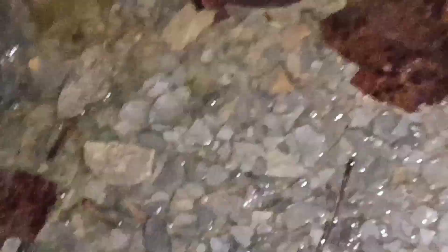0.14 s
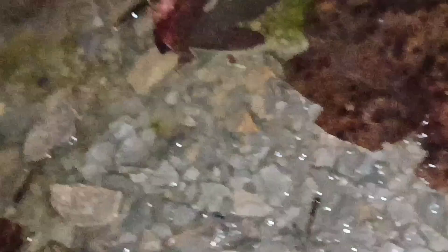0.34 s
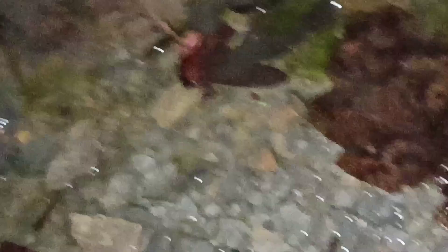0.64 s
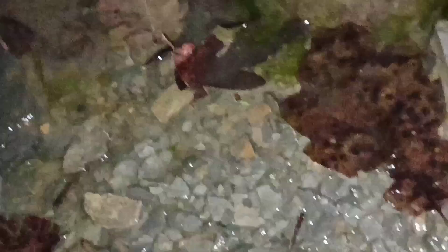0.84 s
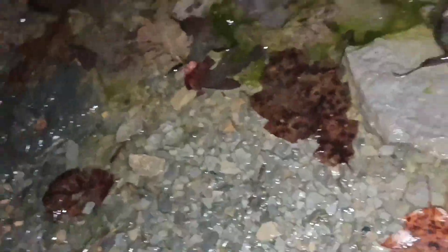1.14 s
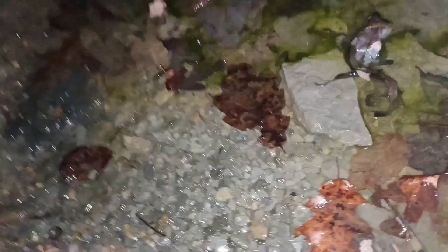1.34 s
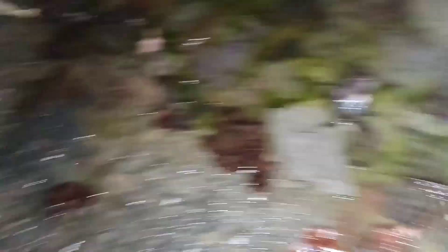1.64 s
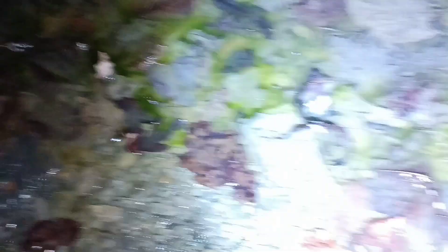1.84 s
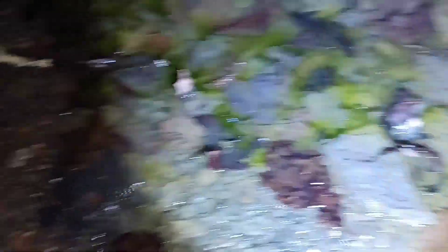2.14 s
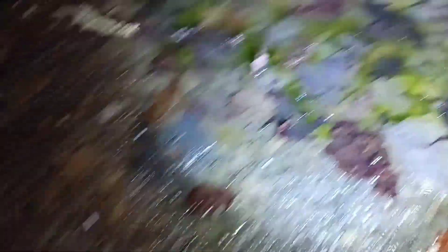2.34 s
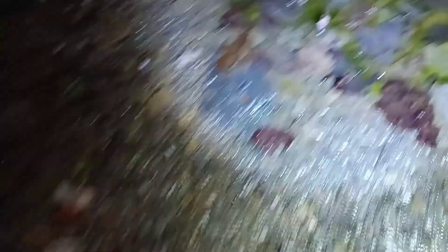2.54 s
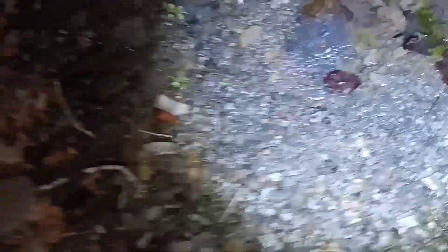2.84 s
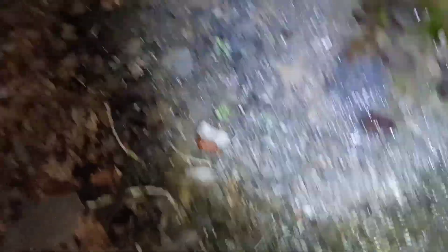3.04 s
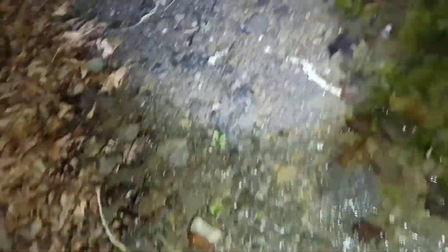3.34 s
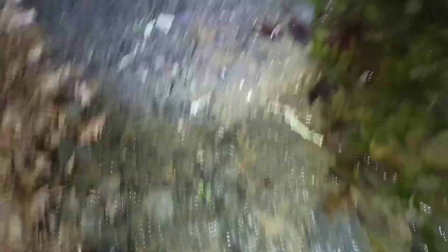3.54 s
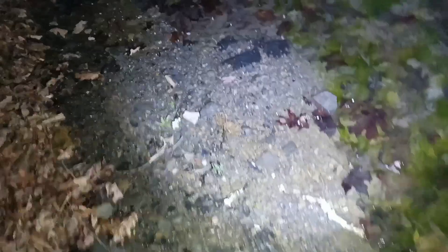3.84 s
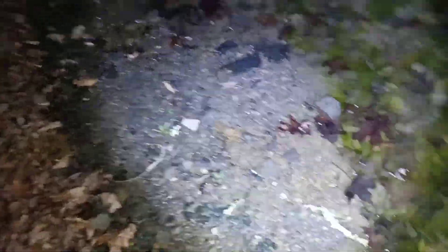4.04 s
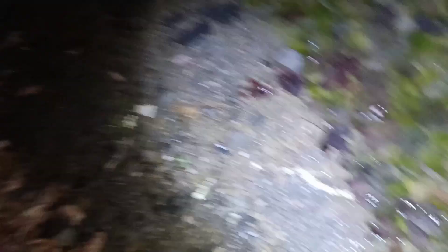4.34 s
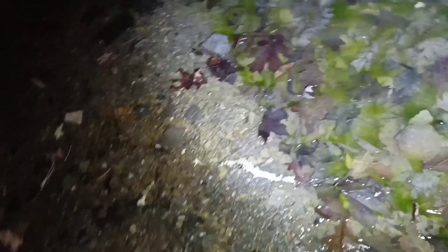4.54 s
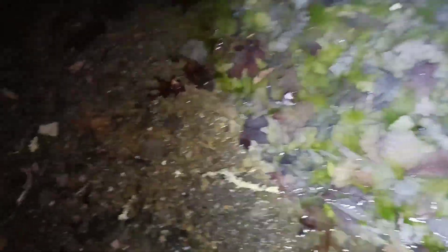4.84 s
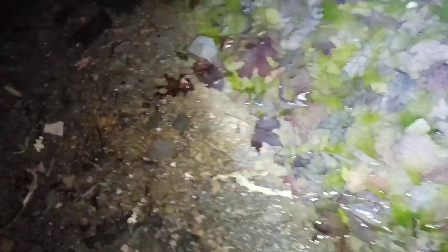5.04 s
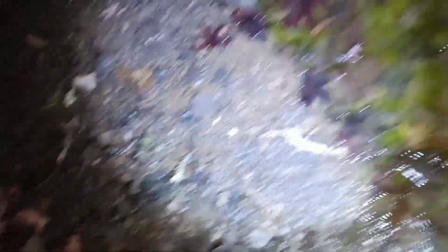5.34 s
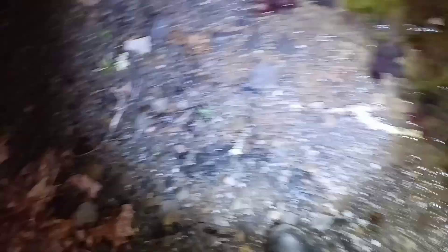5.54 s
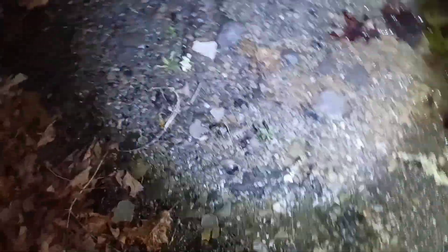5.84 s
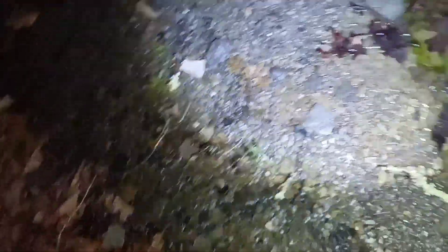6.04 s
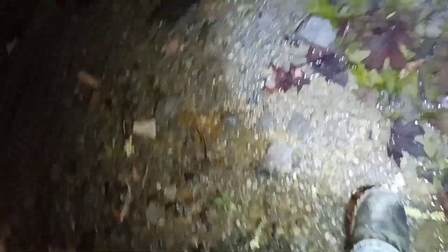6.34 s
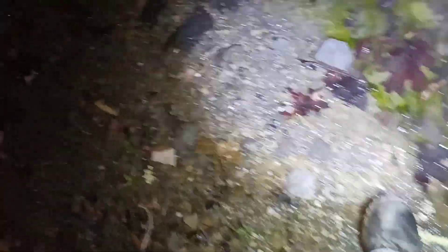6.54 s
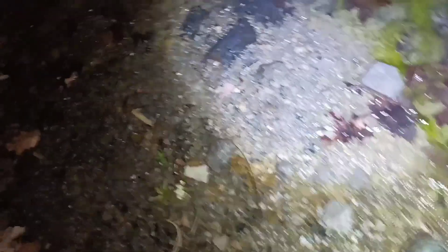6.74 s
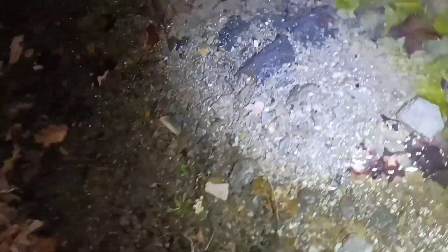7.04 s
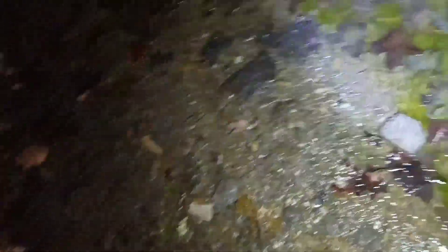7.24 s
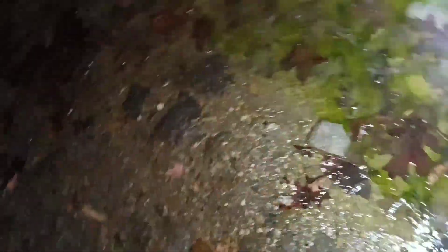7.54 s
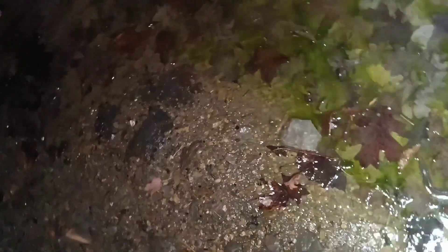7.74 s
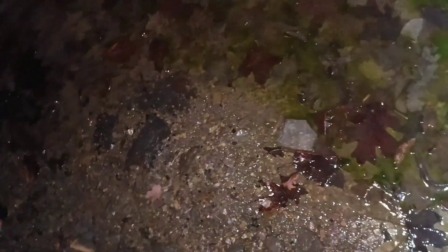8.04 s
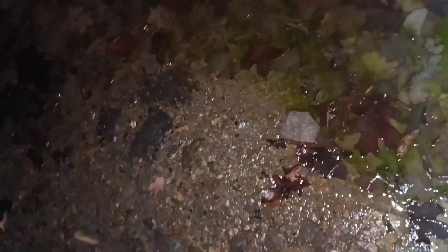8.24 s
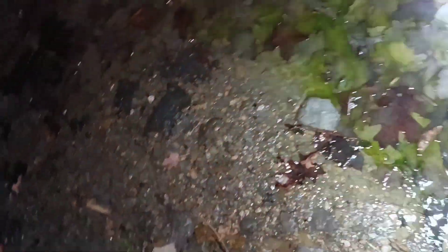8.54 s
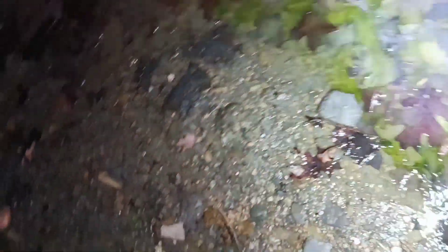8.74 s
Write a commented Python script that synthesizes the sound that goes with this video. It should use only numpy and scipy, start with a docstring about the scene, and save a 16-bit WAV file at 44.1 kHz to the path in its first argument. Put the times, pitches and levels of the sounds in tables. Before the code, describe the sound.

Small frogs creak in an overlapping chorus over a low hum, with gravel clicks, a few handling knocks and a late swelling rush.

```python
"""Night, beside a wet gravel track. From the start a low far hum lies under a chorus of small frogs,
each call a rising creak of some seventy pulses a second ringing in a vocal sac. Half a second in, a hand
knocks softly and ticks on the recorder, and grit begins to click and scuff underfoot.
Near the end a broad rush swells up on the left, and one lower-pitched frog trills through it."""
import sys
import numpy as np
from scipy import signal
from scipy.fft import rfft, irfft, next_fast_len
from scipy.io import wavfile
from scipy.ndimage import uniform_filter1d, minimum_filter1d

SR = 44100
rng = np.random.default_rng(int(sys.argv[2]) if len(sys.argv) > 2 else 0)


def to_wav(sig):
    """Store sig (one row per channel, or 1-D mono) as 16-bit WAV at the path in sys.argv[1].

    Samples outside -1..1 are clipped; the rate is SR.
    """
    pcm = np.clip(np.atleast_2d(sig), -1, 1) * 32767
    pcm = np.round(pcm).astype(np.int16)
    wavfile.write(sys.argv[1], SR, pcm.T)  # frames by channels


N = 391616
TIME = np.arange(N) / SR


def from_db(db):
    """Decibels to gain."""
    return 10 ** (np.asarray(db) / 20)


def unit_rms(x):
    """Scale to an rms of 1."""
    return x / np.sqrt(np.mean(x ** 2) + 1e-20)


def panned(pan_db):
    """Gains at the two microphones; pan_db is left over right."""
    return from_db(np.array([[.5], [-.5]]) * pan_db)


def level_curve(rows):
    """Join (time_s, level_db) points at every sample."""
    return np.interp(TIME, *np.transpose(rows))


def at_hz(points, hz):
    """Read a spectrum on a log-frequency axis."""
    freq_hz, values = np.transpose(points)
    return np.interp(np.log(hz + 1), np.log(freq_hz), values)


def bell(centre_s, half_width_s):
    """A smooth rise to 1 and fall."""
    return np.exp(-((TIME - centre_s) / half_width_s) ** 2)


def pulse(age, rise_s, fall_s):
    """Envelope that swells and then closes quickly; rms 1."""
    return unit_rms((1 - np.exp(-age / rise_s)) * np.exp(-(age / fall_s) ** 2))


def lowpass(x, cutoff_hz, order=2):
    """Roll off the treble."""
    return signal.sosfilt(signal.butter(order, cutoff_hz, fs=SR, output="sos"), x)


def add(out, start_s, sound):
    """Mix a stereo sound in at a time."""
    at = round(start_s * SR)
    first, last = max(at, 0), min(at + sound.shape[1], N)
    out[:, first:last] += sound[:, first - at:last - at]


def drift(rate_hz):
    """Random wander; rms 1."""
    points = rng.standard_normal(int(rate_hz * N / SR) + 2)
    return unit_rms(np.interp(TIME * rate_hz, np.arange(len(points)), points))


def echoes(x, level_db, t60_s, delay_s, dull_hz):
    """The direct sound with a dull, dying cloud of reflections behind it."""
    t = np.arange(int(t60_s * SR)) / SR
    cloud = rng.standard_normal((2, len(t))) * from_db(-60 * t / t60_s) * (t > delay_s)
    cloud = lowpass(unit_rms(cloud) * from_db(level_db) / np.sqrt(len(t)), dull_hz)
    cloud[:, 0] = 1
    return signal.fftconvolve(x, cloud, axes=1)[:, :N]


# How alike noise is at the two microphones: freq_hz, correlation
MIC_CORRELATION = [(60, 0.87), (200, -0.22), (600, -0.21)]
def noise(spectrum):
    """Stereo noise of a given colour, falling away beyond its ends; rms 1."""
    size = next_fast_len(N)
    hz = np.fft.rfftfreq(size, 1 / SR)
    ends = 1 / (1 + (hz / spectrum[-1][0] / 1.2) ** 12) / (1 + (spectrum[0][0] / (hz + 1) / 1.5) ** 4)
    alike = np.clip(at_hz(MIC_CORRELATION, hz), -1, 1)
    mid, side = rfft(rng.standard_normal((2, size))) * from_db(at_hz(spectrum, hz)) * ends
    pair = np.sqrt(1 + alike) * mid + np.sqrt(1 - alike) * side * [[1], [-1]]
    return unit_rms(irfft(pair, size)[:, :N])


# Night air with its far hum, and the farthest frogs: freq_hz, density_db
NIGHT_AIR = [(25, -24.5), (70, -1.5), (150, -15.5), (800, -18.5), (1400, -48), (6400, -18.5), (8500, -40.5),
             (14000, -52)]
FAR_CHORUS = [(1700, -13), (2100, -8.5), (2500, -17.5), (3000, -18)]
def night_ambience(air_db=-49.5, chorus_db=-47, pan_db=4):
    """The bed of the place: humming air, and frogs so distant that they blur."""
    air = from_db(air_db + drift(36)) * noise(NIGHT_AIR)
    flicker_db = 2.5 * drift(11) + 3 * drift(140)
    chorus = from_db(chorus_db + flicker_db) * noise(FAR_CHORUS)
    return (air + chorus) * panned(pan_db)


# Colour of the calls' rasp and overtones, with a faint thin band near 10 kHz: freq_hz, density_db
CALL_COLOUR = [(500, -17.5), (1100, 9), (3400, 4), (4700, 2.5), (6400, 4.5), (7600, -18.5), (9200, -39.5),
               (10400, -21), (11600, -52)]
# Partials of a call: multiple_of_half_pitch, level_db
PARTIALS = [(1, 6), (3, 11.5), (4, 4.5), (5, 1), (9, -0.5)]
# Voices by name (shares are of the pitch):
# swell_db, push_db, climb_share_per_s, flick_share, edge_db, rasp_db, ring_s, echo_db
FROG_VOICES = {"reedy": (7, 9, .42, .17, -12.5, -7, .0064, -13),
               "hoarse": (14, 2, .38, .1, -12.5, 4, .008, -10),
               "clear": (14, 7, .54, .12, -13.5, -4, .0062, -13.5),
               "level": (16, 0, .36, .04, -14.5, -2, .007, -12.5),
               "round": (14, 2, .38, .07, -21, -3, .0068, -11),
               "distant": (11, 2, .44, .06, -20, -4, .008, -6)}
def croak(length_s, pitch_hz, peak_db, pan_db, voice, rasp):
    """Each pulse rings the vocal sac, with an edge of overtones and rasp. Ground and bank echo it."""
    swell_db, push_db, climb, flick, edge_db, rasp_db, ring_s, echo_db = FROG_VOICES[voice]
    attack_s, climb_s, push_s, flick_s, release_s = .0361, .23, .08, .027, .017
    t = np.arange(int(length_s * SR)) / SR
    to_go = t[-1] - t
    # higher voices pulse faster, and all pulse more slowly early in the call
    pulses_per_s = 77 * pitch_hz / 2450
    which, within = np.divmod(-pulses_per_s * to_go * (1 - .2 * to_go), 1)
    age = within / pulses_per_s
    strength, detune, slip = rng.standard_normal((SR, 3))[which.astype(int)].T   # drawn per pulse
    # the pitch settles, holds, climbs, flicks up at the end, and sags within each pulse
    sharp = .04995 * np.exp(-t / attack_s)
    flat = climb * climb_s * np.tanh(to_go / climb_s)
    hz = pitch_hz * (1 + sharp - flat + flick * np.exp(-to_go / flick_s))
    sagging_hz = hz * (1 + .021 * detune + .075 * (.5 - within))
    mic_lag_s = np.array([[.00056], [0]])
    half_phase = np.pi * (np.cumsum(sagging_hz) / SR - hz * mic_lag_s) + .55 * slip
    # the sac flutters within each pulse, more so in raspy voices
    shake, twist, waver = (unit_rms(lowpass(rng.standard_normal(SR), 330))[:len(t)] for _ in range(3))
    tone = np.sin(2 * half_phase)
    flutter = (shake * tone + twist * np.cos(2 * half_phase)) / np.sqrt(2)
    sac = unit_rms(tone + .42 * from_db(rasp_db) * flutter) * pulse(age, rise_s=.0014, fall_s=ring_s)
    # the gliding overtones take the same colour as the rasp; the high ones waver most
    wavering = half_phase + .13 * waver
    reed = sum(from_db(db + at_hz(CALL_COLOUR, k * hz / 2))
               * np.sin(k * wavering + rng.uniform(0, 2 * np.pi)) for k, db in PARTIALS)
    snap = unit_rms(reed) * pulse(age, rise_s=.001, fall_s=.0054)
    at = int(rng.random() * N / 2)
    hiss = from_db(rasp_db) * rasp[:, at:at + len(t)] * pulse(age, rise_s=ring_s / 2, fall_s=ring_s)
    edge = from_db(edge_db) * unit_rms(snap + hiss) * panned(2)
    # the call fades in, swells and ends on a last push
    level_db = peak_db - swell_db * (to_go / t[-1]) ** 1.39 - push_db * np.tanh((to_go / push_s) ** 2)
    fades = np.clip(t / attack_s, 0, 1) * np.clip(to_go / release_s, 0, 1) ** 2 * (1 - within ** 10)
    call = (sac + edge) * from_db(level_db + 1.2 * strength) * fades * panned(pan_db)
    return echoes(call, echo_db, t60_s=.1, delay_s=.0018, dull_hz=7100)


# Frogs by the track, mostly to the left: end_s, length_s, pitch_hz, level_db, pan_db, voice
NEAR_CALLS = [(0.292, 0.39, 2524, -17, 9.5, "hoarse"), (0.313, 0.38, 2372, -16, 6, "hoarse"),
              (0.661, 0.34, 2260, -24.5, 4.5, "round"), (0.748, 0.26, 2470, -17.5, 8.5, "reedy"),
              (1.053, 0.32, 2156, -17.5, 9, "level"), (1.18, 0.49, 2385, -16, 5.5, "clear"),
              (1.549, .25, 2507, -17.5, 9.5, "reedy"), (1.633, 0.14, 2830, -33.5, 10, "distant"),
              (1.685, 0.19, 2114, -25, 6, "level"), (1.785, 0.13, 2480, -21, 11.5, "level"),
              (1.858, 0.23, 2183, -15, 4.5, "hoarse"), (1.955, 0.25, 2382, -20.5, 19.5, "round"),
              (2.152, 0.25, 2505, -26, 5.5, "distant"), (2.199, 0.36, 1633, -43.5, 0, "distant"),
              (2.417, 0.17, 2352, -23, 11.5, "round"), (2.537, 0.29, 2530, -16.5, 9.5, "reedy"),
              (2.813, 0.29, 2371, -22, 9, "level"), (2.953, 0.34, 2655, -19.5, 3.5, "distant"),
              (3.042, 0.14, 2584, -32, 12, "distant"), (3.205, 0.3, 3140, -43.5, 9, "distant"),
              (3.433, 0.25, 2365, -18.5, 8.5, "level"), (3.497, 0.14, 2500, -10.5, 11.5, "clear"),
              (3.642, 0.24, 2452, -16, 8.5, "clear"), (3.94, 0.26, 2490, -20.5, 3, "clear"),
              (4.033, 0.15, 2434, -25.5, 8, "clear"), (4.297, .19, 2054, -30.5, 17.5, "round"),
              (4.473, 0.26, 2310, -16.5, 10, "clear"), (4.662, 0.2, 2266, -27.5, 8.5, "distant"),
              (4.736, 0.13, 2500, -18, -1.5, "clear"), (5.051, 0.3, 2524, -19, 6.5, "round"),
              (5.099, 0.085, 2380, -15.5, 1, "round"), (5.321, 0.26, 2240, -24.5, 8.5, "level"),
              (5.416, 0.2, 2403, -15.5, 6, "clear"), (5.48, 0.13, 2750, -27, 3, "distant"),
              (5.743, 0.26, 2526, -29.5, 12, "clear"), (5.893, .16, 2512, -22, 13.5, "round"),
              (6.037, 0.19, 2430, -24, 0, "distant"), (6.132, 0.1, 2434, -27.5, 11.5, "distant"),
              (6.305, 0.17, 2014, -31.5, 12, "round"), (6.516, 0.29, 2404, -17, 12.5, "clear"),
              (6.553, 0.23, 2310, -20, 3, "distant"), (6.948, 0.19, 2492, -17, 7.5, "round"),
              (7.02, 0.21, 2510, -24, 10, "round"), (7.289, .22, 2430, -21, 7, "distant"),
              (7.374, 0.12, 2350, -13.5, 9, "round"), (7.729, 0.33, 2224, -18, 2.5, "level"),
              (7.802, 0.3, 2426, -23, 20, "reedy"), (8.376, 0.2, 2290, -19.5, 12, "round"),
              (8.806, 0.5, 2405, -18, 0, "clear")]
def frog_chorus(answers_per_s=4, answer_hz=2400, answer_db=-40):
    """The nearby callers, and fainter ones answering at random from farther off."""
    out, rasp = np.zeros((2, N)), noise(CALL_COLOUR)
    for end_s, length_s, *call in NEAR_CALLS:
        add(out, end_s - length_s, croak(length_s, *call, rasp))
    for k, (late, detune, nearness) in enumerate(rng.uniform(-1, 1, (64, 3))):
        start_s = (k + late / 2) / answers_per_s
        if start_s < TIME[-1]:
            pitch_hz, level_db = answer_hz * (1 + .14 * detune), answer_db + 8 * nearness
            add(out, start_s, croak(.25, pitch_hz, level_db, pan_db=5, voice="distant", rasp=rasp))
    return lowpass(out, 11000, order=6)   # takes the sharp clicks off the top of the calls


# Fingers on the case beside the right microphone: start_s, level_db
FINGER_TICKS = [(0.5017, -20), (1.2988, -30), (4.5426, -13), (4.59, -15), (4.5937, -20.5)]
# Colour of a tick: freq_hz, density_db
TICK_SPECTRUM = [(1500, 12), (6500, 7), (10000, -1), (15500, -16)]
def finger_ticks(decay_s=.0013, pan_db=-11):
    """Fingers make dry, very bright snaps on the case."""
    force, t = np.zeros((2, N)), np.arange(SR // 10) / SR
    for start_s, level_db in FINGER_TICKS:
        add(force, start_s, from_db(level_db) * np.exp(-t / decay_s) * panned(pan_db))
    return force * noise(TICK_SPECTRUM)


# Handling knocks on the recorder: start_s, level_db, pitch_hz, t60_s, pan_db
HAND_KNOCKS = [(0.502, -12, 356, 0.039, -15), (0.714, -32.5, 388.3, 0.016, -32),
               (0.962, -16, 384, 0.0041, -25), (1.0734, 0, 427, 0.0049, -14.5),
               (1.1337, -29, 734, 0.0059, -37.5), (1.3021, -11.5, 487, 0.014, -20),
               (2.8152, -21, 862, 0.039, 5), (4.414, -11, 955, 0.0051, 12), (4.5424, -6, 204, 0.0096, -18)]
def hand_knocks(upper_db=-7, upper_ratio=2.55, crack_db=-15, crack_s=.008):
    """A fingertip blow sets off a heavily damped low mode of the case and a shorter upper one."""
    out, t = np.zeros((2, N)), np.arange(SR // 10) / SR
    case = signal.butter(2, [130, 2400], "band", fs=SR, output="sos")
    for start_s, level_db, pitch_hz, t60_s, pan_db in HAND_KNOCKS:
        decay = from_db(-60 * t / t60_s)
        low = np.cos(2 * np.pi * pitch_hz * t) * decay
        upper = from_db(upper_db) * np.sin(2 * np.pi * pitch_hz * upper_ratio * t) * decay ** 2
        crack = from_db(crack_db) * rng.standard_normal((2, len(t))) * np.exp(-t / crack_s)
        add(out, start_s, from_db(level_db) * signal.sosfilt(case, low + upper + crack) * panned(pan_db))
    return out


# Grit clicking underfoot: start_s, level_db, pan_db
GRIT_CLICKS = [(0.5388, -5, 7), (0.6085, -7.5, 14), (1.8583, -8, 14), (2.583, -17.5, 24.5), (2.809, 1.5, 7),
               (4.3008, -5, 19), (4.5593, 2.5, 3.5), (7.1826, -8, 16.5)]
# Soles scuffing the track: centre_s, half_width_s, level_db
SOLE_SCUFFS = [(2.771, 0.024, -28.5), (3.767, 0.12, -38), (5.313, 0.031, -28), (7.332, 0.036, -28.5)]
# Colour of the stones: freq_hz, density_db
STONE_SPECTRUM = [(700, 13.5), (2000, -2), (6200, 11.5), (8000, -6), (15500, -36.5)]
def gravel(contact_s=.002, click_s=.0011, click_db=-3, tail_db=-32, tail_s=.055, grain_db=5):
    """Small stones snap against each other; a scuff is a cloud of such grains."""
    force, t = np.zeros((2, N)), np.arange(SR // 10) / SR
    decay = np.exp(-t / click_s) + from_db(tail_db) * np.exp(-t / tail_s)
    click = np.clip(t / contact_s, 0, 1) * decay
    for start_s, level_db, pan_db in GRIT_CLICKS:
        add(force, start_s, from_db(level_db + click_db) * click * panned(pan_db))
    grains = unit_rms(from_db(grain_db * drift(430)))
    for centre_s, half_width_s, level_db in SOLE_SCUFFS:
        force += from_db(level_db) * grains * bell(centre_s, half_width_s)
    return force * noise(STONE_SPECTRUM)


# Rise and fall of the rush: time_s, level_db
RUSH_SWELL = [(5.0, -42), (6.1, -46.5), (6.6, -39.5), (7.05, -40), (7.4, -32.5), (7.72, -27), (8.0, -29.5),
              (8.2, -27), (8.45, -32.5), (8.88, -36.5)]
# Its three layers: freq_hz, density_db
BODY_SPECTRUM = [(380, -7), (600, 1.5), (1050, -5.5), (1700, 1.5), (2650, -2.5)]
RUMBLE_SPECTRUM = [(45, -19), (70, 4), (140, -10.5), (240, 1.5), (350, -10)]
HISS_SPECTRUM = [(2500, 4), (4500, 11), (6300, 9.5), (7800, -9.5), (11000, -45)]
def rush(body_db=2, rumble_db=-39, hiss_db=-42, swish_db=-34, diffuse_db=-8, lag_s=.00143, pan_db=7):
    """A broad rush off to the left: a hollow body, a steadier rumble and a swish as it goes by."""
    swell_db = level_curve(RUSH_SWELL)
    below_peak_db = swell_db - swell_db.max()
    body = from_db(body_db + swell_db + drift(60)) * noise(BODY_SPECTRUM)
    rumble = from_db(rumble_db + .54 * below_peak_db) * noise(RUMBLE_SPECTRUM)
    swish = from_db(swish_db) * bell(centre_s=7.88, half_width_s=.22)
    hiss = (from_db(hiss_db + .8 * below_peak_db) + swish) * noise(HISS_SPECTRUM)
    fade_in = np.clip(TIME - RUSH_SWELL[0][0] + .5, 0, 1)
    direct, diffuse = (body + rumble + hiss) * fade_in
    left = np.interp(TIME - lag_s, TIME, direct)   # it reaches the left microphone late
    right = direct + from_db(diffuse_db) * diffuse
    return np.array([left, right]) * panned(pan_db)


# Low murmur of air, near the centre: freq_hz, density_db
MURMUR_SPECTRUM = [(170, -21), (250, -1), (380, -15)]
def air_murmur(level_db=-40.5, pan_db=2):
    """A faint, dull swell of air comes and goes before the rush builds."""
    swell = from_db(level_db) * bell(centre_s=6.014, half_width_s=.19)
    return swell * noise(MURMUR_SPECTRUM) * panned(pan_db)


# The lower frog, left of centre: time_s, level_db
TRILL_LEVEL = [(7.7, -42), (8.1, -33.5), (8.45, -36.5), (8.7, -25.5), (8.88, -29.5)]
def frog_trill(pitch_hz=1496, pulses_per_s=30.3, waver=.017, pan_db=6):
    """A slower, lower frog: rounded pulses on a nearly steady note."""
    start_s, end_s = TRILL_LEVEL[0][0], TRILL_LEVEL[-1][0]
    age = (TIME - end_s) * pulses_per_s % 1 / pulses_per_s
    phase = 2 * np.pi * np.cumsum(pitch_hz * (1 + waver * drift(120))) / SR
    note = np.sqrt(2) * np.sin(phase - np.array([[0], [1]]))   # a radian later on the right
    level = from_db(level_curve(TRILL_LEVEL)) * (TIME > start_s)
    return note * pulse(age, rise_s=.002, fall_s=.018) * level * panned(pan_db)


# Treble loss at the right microphone: freq_hz, gain_db
RIGHT_MIC_SHADE = [(3500, -0.5), (6200, -11.5), (10000, -1.5)]
def mic_shade(x):
    """The right microphone faces away from the scene, so airborne sound reaches it dulled."""
    size = next_fast_len(N)
    shade = from_db(at_hz(RIGHT_MIC_SHADE, np.fft.rfftfreq(size, 1 / SR)))
    return np.array([x[0], irfft(rfft(x[1], size) * shade, size)[:N]])


def scene(chorus_db=-1):
    """Frogs and gravel echo among the trees; knocks and ticks reach the microphones through the case."""
    trackside = gravel() + frog_trill() + from_db(chorus_db) * frog_chorus()
    among_trees = echoes(trackside, level_db=-19, t60_s=.7, delay_s=.01, dull_hz=3000)
    handling = hand_knocks() + finger_ticks()
    return handling + mic_shade(among_trees + night_ambience() + rush() + air_murmur())


def record(dry, ceiling=.9, window_samples=201, cutoff_hz=15900):
    """The recorder's quick limiter holds down the loudest peaks, and the top is cut steeply."""
    gain = 1 / np.maximum(1, np.abs(dry).max(axis=0) / ceiling)
    gain = uniform_filter1d(minimum_filter1d(gain, window_samples), window_samples)
    return signal.sosfilt(signal.ellip(10, .1, 90, cutoff_hz, fs=SR, output="sos"), dry * gain)


dry = scene()
out = record(dry)
to_wav(out)
```